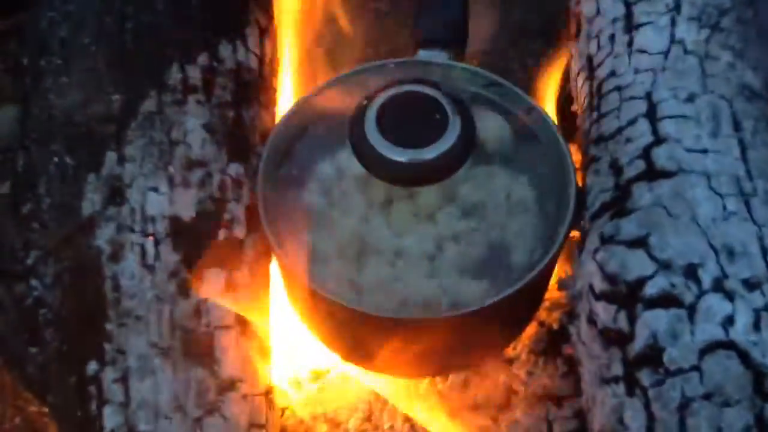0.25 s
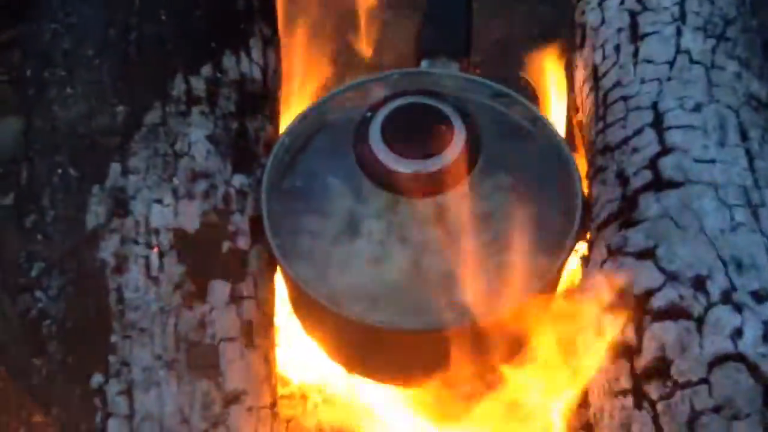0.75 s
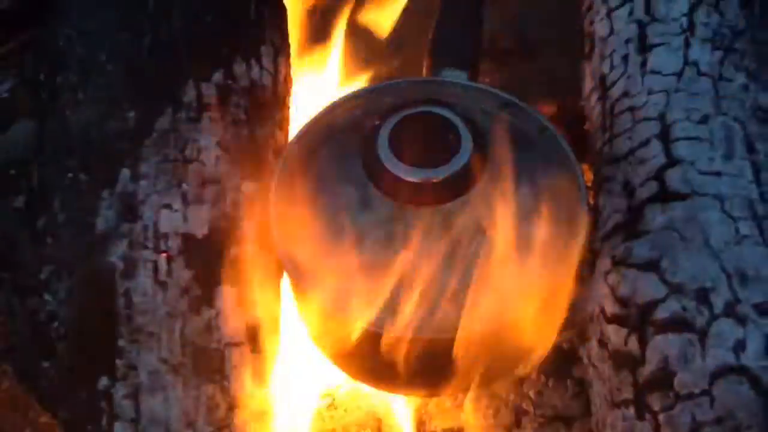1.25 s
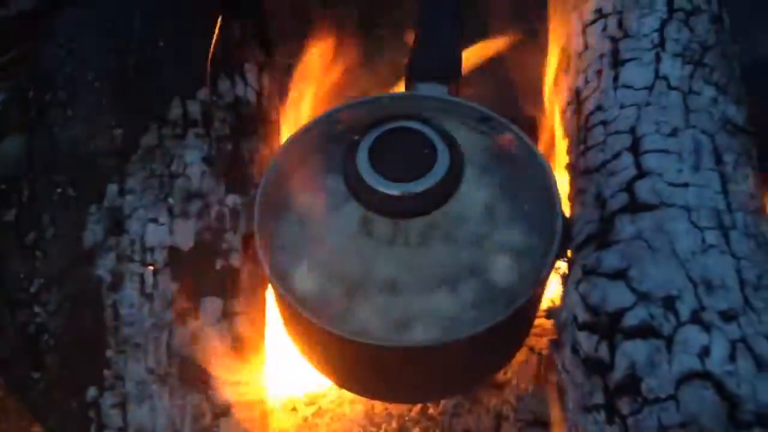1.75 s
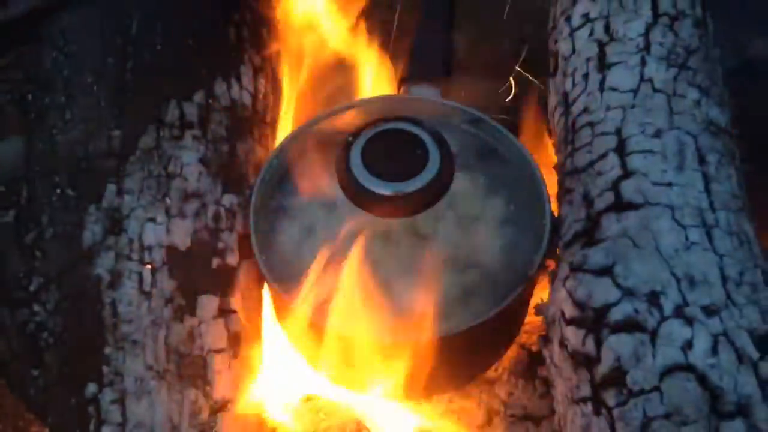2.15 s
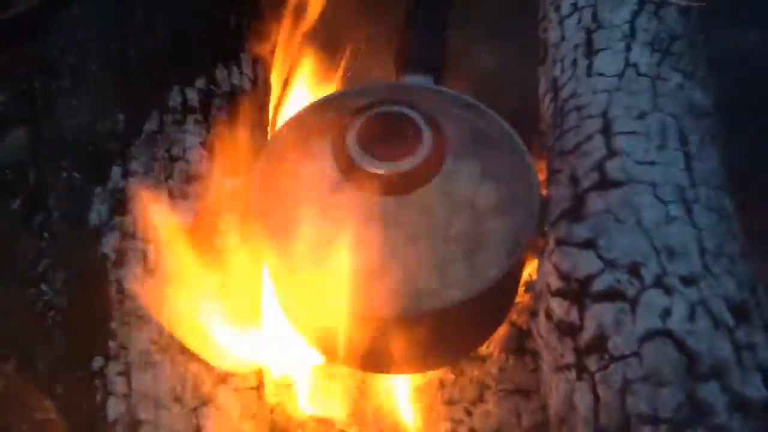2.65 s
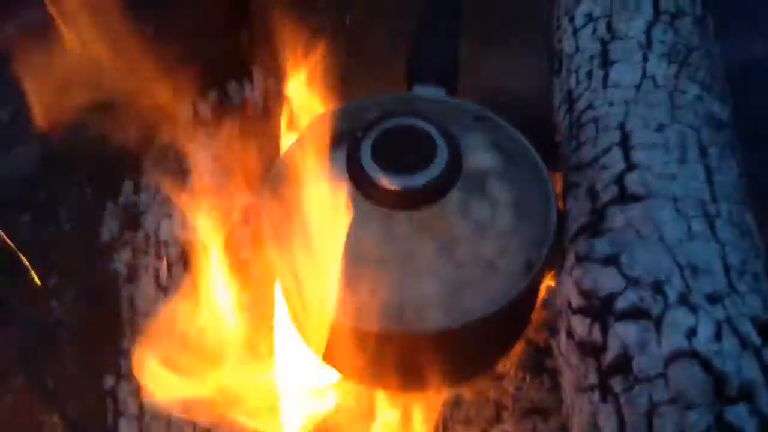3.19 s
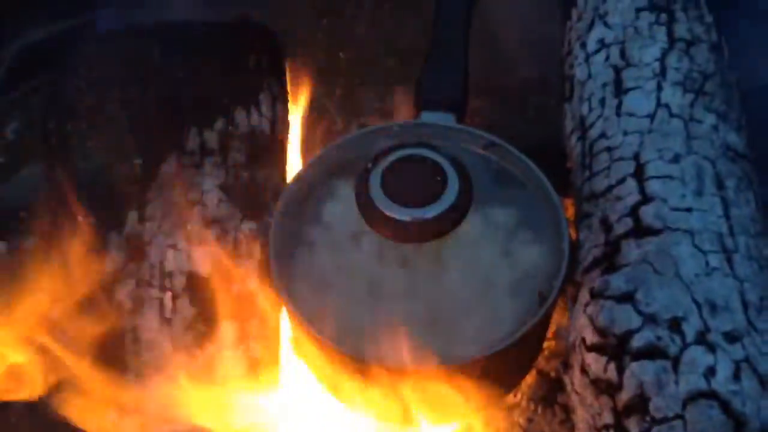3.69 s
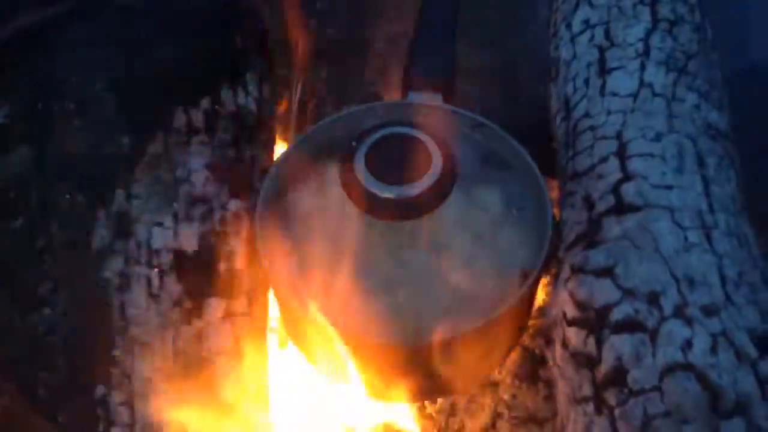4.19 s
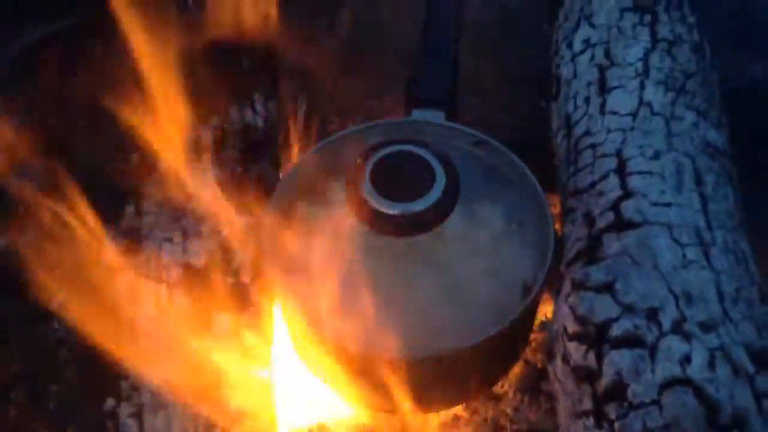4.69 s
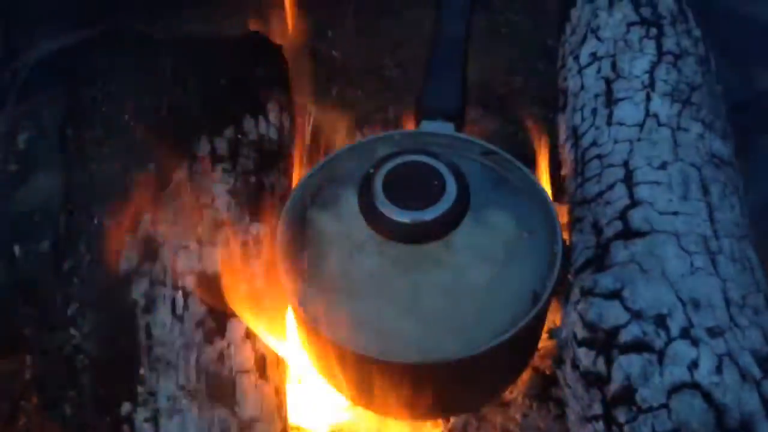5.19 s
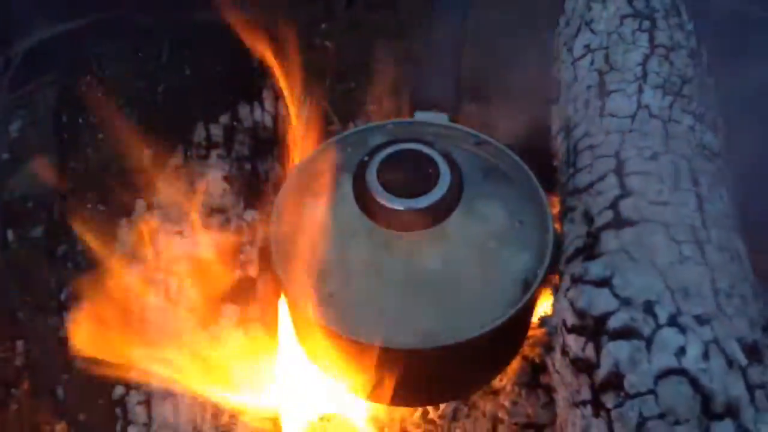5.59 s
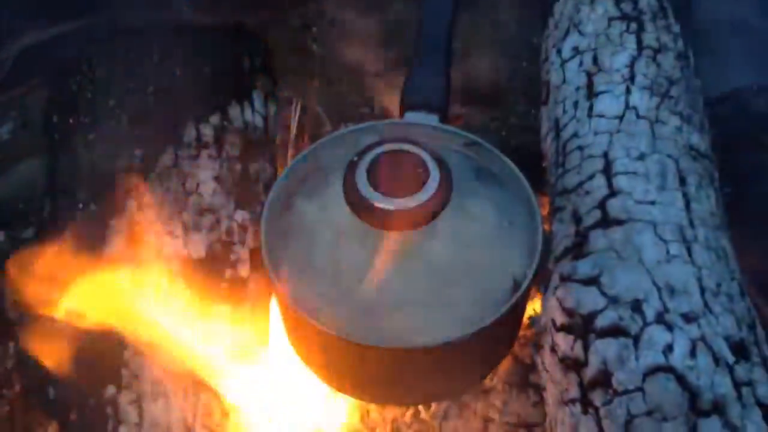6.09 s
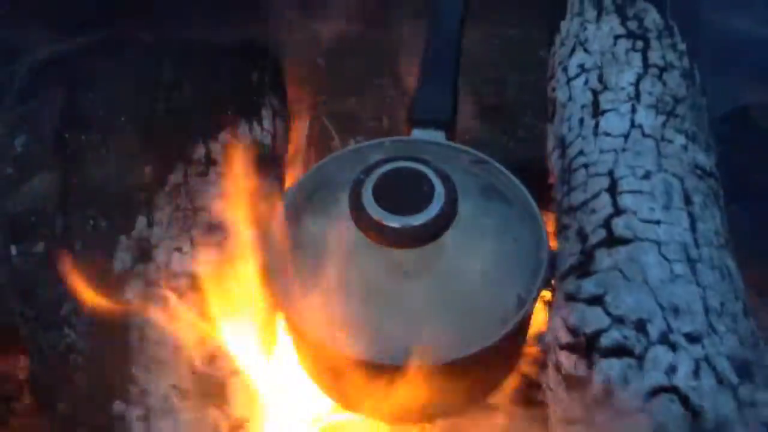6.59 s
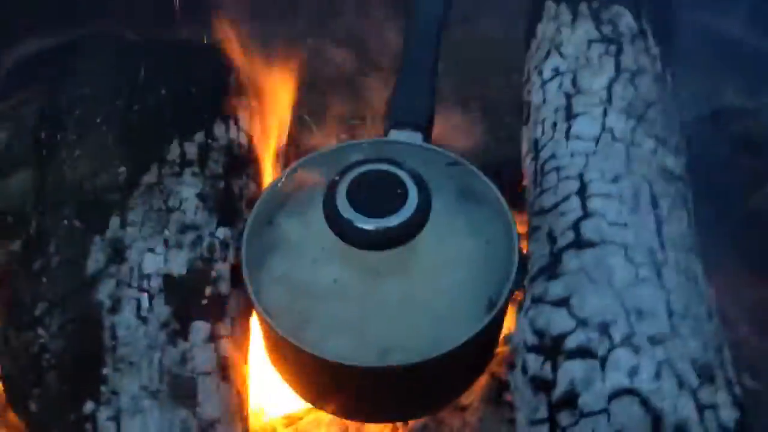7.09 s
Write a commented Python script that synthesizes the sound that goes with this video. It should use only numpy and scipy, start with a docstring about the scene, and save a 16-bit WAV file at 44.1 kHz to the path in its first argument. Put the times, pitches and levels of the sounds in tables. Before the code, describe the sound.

A close, dry microphone above a campfire pan picks up irregular popping throughout, densest around two seconds and again after five and a half. Bright cracks ring the metal briefly over steady frying hiss and skittering kernels. The hiss rises with short steam spurts in the middle. Fire rushes and flutters softly underneath, with bright crackling snaps and brief gusts, then eases near the end.

```python
"""Outdoors, close above an open wood fire with no echo, popcorn pops in a lidded pan.
Each hull cracks as shaped noise, spits steam, and rings pan, lid and the air inside as damped modes.
Dropping kernels tap the pan, and now and then something knocks. Random rains of tiny noise bursts
make the sizzling, frying and skittering. Wood and oil snap, and noise makes the fluttering flames."""
import sys
import numpy as np
from scipy import signal
from scipy.fft import rfft, irfft
from scipy.io import wavfile
from scipy.ndimage import uniform_filter1d

SR = 44100
rng = np.random.default_rng(int(sys.argv[2]) if len(sys.argv) > 2 else 0)


def wrap_up_sound(samples):
    """Save the sound to the file named by the first command line argument, as 16-bit audio."""
    columns = np.atleast_2d(samples).T
    # keep every value between -1 and 1, then stretch to whole-number steps
    tamed = np.clip(columns, -1, 1)
    steps = np.round(tamed * 32767).astype(np.int16)
    wavfile.write(sys.argv[1], SR, steps)


N = 323870
HIT_SIZE = 4096  # samples in one hit
AGE = np.arange(HIT_SIZE) / SR  # seconds since a hit began
TIME = np.arange(N) / SR  # seconds since the scene began
POP_S, SNAP_S = 0.008, 0.004  # seconds over which the level of a hit is counted
USUAL_BOIL_DB = -43  # the boil at which frying and skittering have their basic levels

# kernels bursting, and at 2.931 s a small knock; levels before each part's own offset:
# t/s, hull crack/dB, steam spit/dB, kick on lid and air/dB, note of the hull f/Hz
POPS = [(0.1516, -26, -27.5, -49, 5760), (0.1812, -26.5, -22.5, -45, 5700), (0.185, -31.5, -47, -50, 5600),
        (0.213, -33.5, -37, -50.5, 5700), (0.401, -31, -22.5, -48, 5430), (0.465, -41, -53, -52.5, 5700),
        (0.853, -35.5, -37, -44.5, 6400), (0.8736, -41.5, -33, -45.5, 8800),
        (1.0302, -32.5, -39, -36.5, 8700), (1.3545, -26.5, -25, -43, 3210), (1.384, -34, -30.5, -48, 8500),
        (1.409, -28.5, -29.5, -36, 2860), (1.532, -39, -43, -46, 4600), (1.7446, -28, -20.5, -41.5, 8600),
        (1.85, -37.5, -31.5, -47, 2780), (1.894, -33.5, -33.5, -44.5, 6670), (1.9036, -36, -51, -53, 6500),
        (2.081, -32.5, -32, -36.5, 7800), (2.0882, -28, -31, -57, 8700), (2.0943, -29, -26, -39, 4900),
        (2.0993, -26, -27, -41.5, 3670), (2.1758, -25.5, -23.5, -43.5, 7400),
        (2.402, -31, -34.5, -37.5, 2600), (2.4243, -35.5, -45, -37.5, 5600),
        (2.4319, -37.5, -41, -37, 2600), (2.5055, -33, -33, -39.5, 4740), (2.7466, -39, -40, -39.5, 2650),
        (2.7517, -33, -49, -38.5, 5300), (2.931, -35.5, -37, -42, 3320), (3.157, -38.5, -40, -54, 8700),
        (3.2141, -26, -33, -40.5, 4560), (3.235, -29.5, -22.5, -35.5, 4500), (3.2678, -32, -46, -37, 2880),
        (3.2794, -26.5, -27, -42.5, 3120), (3.389, -26, -21, -42, 3060), (3.398, -22.5, -27, -39, 3070),
        (3.608, -44, -51, -40, 9000), (3.7612, -25.5, -29, -34.5, 8000), (3.8631, -25, -27, -35, 3200),
        (4.0377, -30, -35, -32.5, 2600), (4.0445, -30.5, -39, -52, 3150), (4.465, -42.5, -37, -41, 3250),
        (4.75, -31.5, -24.5, -42, 7600), (4.933, -39.5, -53, -41.5, 3200), (4.9708, -38.5, -32, -47, 3050),
        (5.5162, -26.5, -29, -35.5, 4900), (5.574, -26.5, -24, -35, 4300), (5.6605, -24, -28, -36, 4560),
        (5.6811, -36, -26.5, -43, 8500), (5.8644, -29, -38, -48, 7800), (6.1154, -39, -28, -46.5, 6300),
        (6.139, -31, -32, -37.5, 4560), (6.171, -35.5, -44, -41, 7360), (6.406, -41, -45, -45.5, 4500),
        (6.4578, -23.5, -19.5, -40, 4700), (6.5065, -30, -23.5, -43, 6600), (6.538, -21, -19, -37.5, 4500),
        (6.6604, -25, -24.5, -41, 3160), (6.7194, -24, -21, -42.5, 7900), (6.7946, -33, -36, -44.5, 4100),
        (6.7982, -30, -31.5, -43, 3970), (7.2155, -31.5, -30.5, -53, 6350)]
# how hard the oil boils; drives sizzle, frying and skittering: t/s, boil level/dB
BOIL = [(0.0, -48.5), (0.59, -48), (1.16, -45.5), (1.47, -37.5), (1.61, -42.5), (1.8, -46), (2.9, -42),
        (3.09, -42), (3.25, -41), (3.66, -39), (4.15, -39), (5.52, -37), (6.11, -40), (6.27, -40.5),
        (6.46, -43.5), (6.73, -45.5), (6.91, -44.5), (7.34, -43.5)]
# ringing tones of the pan, before random detuning: f/Hz, width/Hz, level/dB
PAN_MODES = [(2980, 170, -4), (3240, 110, 1), (3710, 150, -5), (4520, 150, -2), (5530, 190, -4),
             (6020, 230, -8), (6580, 260, -6)]
# tone colour of a crack: f/Hz, level/dB
CRACK_COLOUR = [(40, -96), (200, -8), (600, -4), (1300, -12), (2300, 3.5), (3100, 10), (6500, 4),
                (9000, -8.5), (16000, -32)]


def undb(db):
    """Decibels to gain."""
    return 10 ** (np.asarray(db) / 20)


def curves(table):
    """Draw straight lines through each column of a table of (t/s, values), for every sample."""
    s, *columns = np.transpose(table)
    return [np.interp(TIME, s, column) for column in columns]


def unit(x):
    """Scale to an rms (average strength) of one."""
    return x / np.sqrt(np.mean(x ** 2))


def sized(x, db, seconds):
    """Give a hit the energy of a sound that holds db for so many seconds."""
    return x * undb(db) * np.sqrt(seconds * SR / np.sum(x ** 2))


def add(track, s, sound):
    """Mix a sound into the track at time s."""
    start = max(int(s * SR), 0)
    track[start:start + len(sound)] += sound[:max(N - start, 0)]


def response(colour):
    """Turn (f/Hz, level/dB) points into a short filter that starts at once (minimum phase)."""
    hz, db = np.transpose(colour)
    bins = np.maximum(np.fft.rfftfreq(HIT_SIZE, 1 / SR), 1)
    level_db = np.interp(np.log(bins), np.log(hz), db)
    cepstrum = irfft(np.log(undb(level_db)))
    # fold the second half onto the first, so that nothing sounds before the hit
    cepstrum[1:HIT_SIZE // 2] *= 2
    cepstrum[HIT_SIZE // 2 + 1:] = 0
    return irfft(np.exp(rfft(cepstrum)))


def through(x, body):
    """Pass a sound through an impulse response."""
    return signal.fftconvolve(x, body)[:len(x)]


def ring(modes, spread_db, detune):
    """Add up dying tones, wider ones dying faster; strength, pitch and sign vary with each blow."""
    hz, width, db = np.transpose(modes)[:, :, None]
    strength, pitch, side = rng.standard_normal((len(modes), 3)).T[:, :, None]
    gain = np.sign(side) * undb(db + spread_db * strength) * np.sqrt(width)
    fade = np.exp(-np.pi * width * AGE)
    tone = np.cos(2 * np.pi * hz * (1 + detune * pitch) * AGE)
    return np.sum(gain * fade * tone, axis=0)


def strike(modes, swell, decay, spread_db, detune):
    """Modes rung by a short push: they swell, lose their first strength quickly and then ring out."""
    shape = (1 - np.exp(-(AGE / swell) ** 2)) * (1 + np.exp(-AGE / decay))
    return shape * ring(modes, spread_db, detune)


def burst(swell, decay, tail_db=-60, tail_s=0.004):
    """A puff of noise that swells, dies fast and leaves a weak scattered tail."""
    fade = np.exp(-AGE / decay) + undb(tail_db) * np.exp(-AGE / tail_s)
    shape = (1 - np.exp(-(AGE / swell) ** 2)) * fade
    return shape * rng.standard_normal(HIT_SIZE)


def walk(rate, size=N):
    """A smooth random wander: levels held for 1 / rate seconds, smoothed twice, with spread near one."""
    hold = max(int(SR / rate), 2)
    steps = np.repeat(rng.standard_normal(size // hold + 2), hold)
    smooth = uniform_filter1d(uniform_filter1d(steps, hold), hold)
    return unit(smooth)[:size]


def grains(rate, spread_db, decay, limit_db):
    """A random rain of tiny noise bursts, about rate a second, mostly weak and a few strong."""
    chance, size, noise = rng.random(N), rng.exponential(size=N), rng.standard_normal(N)
    energy = (chance < rate / SR) * undb(np.minimum(spread_db * size, limit_db)) ** 2
    fading = signal.lfilter([1], [1, -np.exp(-1 / (decay * SR))], energy)
    return unit(noise * np.sqrt(fading))


def surges(table):
    """Power of short swells from rows of (t/s, half length/s, level/dB)."""
    return sum(undb(db) ** 2 * np.exp(-np.minimum(((TIME - s) / half) ** 2, 20))
               for s, half, db in table)


def lid_at(s):
    """Pitch of the lid and how freely it rings at time s."""
    # the lid's ring shifts in pitch and is muffled for a while: t/s, f/Hz, ring offset/dB
    lid_path = [(0, 1969, 5.5), (2.8, 1995, 5.5), (3.3, 1905, -4.5), (3.8, 2110, -3), (5.498, 2053, -7.5),
                (7.3, 2000, 2.5)]
    times, hz, ring_db = np.transpose(lid_path)
    return np.interp(s, times, hz), np.interp(s, times, ring_db)


def fire():
    """Noise in two colours, with wandering levels, makes rushing, fluttering flames; logs crackle."""
    # strength of the fire before the gains below: t/s, rush level/dB, flutter level/dB
    flame_levels = [(0.0, -65, -72), (0.78, -69, -75), (0.98, -62, -64), (1.49, -58.5, -63.5),
                    (1.96, -63, -68.5), (2.27, -56.5, -63.5), (2.7, -61.5, -65), (3.02, -56, -66),
                    (3.93, -52.5, -60.5), (4.37, -56, -62.5), (5.56, -56.5, -66), (5.72, -53, -61),
                    (5.93, -53.5, -65), (6.77, -63, -71), (7.34, -60.5, -70)]
    # colours of rush and flutter: f/Hz, level/dB
    rush_colour = [(150, -13.5), (450, -1), (800, -1.5), (1150, -5), (1550, -2.5), (2500, -2.5),
                   (5000, -24)]
    flutter_colour = [(20, -34), (50, -56), (80, -14), (105, 0), (180, 0.5), (300, -0.5), (450, -7.5),
                      (800, -28.5), (2000, -48)]
    rush_gain_db, flutter_gain_db = 10.5, 22.5
    rush_db, flutter_db = curves(flame_levels)
    crackle = grains(rate=70, spread_db=5, decay=0.0013, limit_db=12)
    rush = (rng.standard_normal(N) + undb(-3) * crackle) * undb(rush_db + 1.0 * walk(23))
    flutter = rng.standard_normal(N) * undb(flutter_db + 3.2 * walk(35))
    return (through(rush, response(rush_colour)) * undb(rush_gain_db)
            + through(flutter, response(flutter_colour)) * undb(flutter_gain_db))


def flares():
    """Flares whoosh in hollow, drifting resonances between the logs; a very short one is a hollow knock."""
    # whooshes of flame, and at 6.328 s a very short hollow knock; 1 dB below their final level:
    # t/s at the middle, half length/s, level/dB, favoured f/Hz
    gusts = [(1.505, 0.094, -53.5, 920), (2.315, 0.0046, -45, 700), (2.36, 0.016, -55, 786),
             (2.922, 0.017, -42.5, 1420), (3.018, 0.085, -49.5, 1320), (3.637, 0.047, -53, 1000),
             (3.944, 0.046, -51, 497), (4.011, 0.038, -45.5, 1450), (5.132, 0.094, -49, 2300),
             (5.689, 0.036, -46.5, 700), (5.743, 0.03, -44, 2560), (5.831, 0.034, -50, 2100),
             (6.328, 0.0032, -44, 1200)]
    # hollow resonances between the logs, before drift: f/Hz, width/Hz, level/dB
    hollow_modes = [(453, 130, -1), (670, 130, 0), (940, 170, -2), (1200, 220, -2.5), (1540, 190, -1),
                    (2010, 450, -2), (2520, 650, -1)]
    wander, rise, flicker_db = 0.04, 0.14, 2.5  # shares of the pitch; spread of each mode's level
    fall_db_per_octave = 4.5  # modes weaken away from the favoured pitch
    out = np.zeros(N)
    for s, half, db, centre_hz in gusts:
        edges = [int((s - 3.5 * half) * SR), int((s + 3.5 * half) * SR)]
        start, end = np.clip(edges, 0, N)
        size = end - start
        swell = np.exp(-((TIME[start:end] - s) / half) ** 2 / 2)
        sound = 0
        for hz, width, mode_db in hollow_modes:
            # the pitch rises and falls with the swell
            pitch = hz * (1 + wander * walk(22, size) + rise * (swell - 1) / 2)
            # random swirls widen each tone into a band of noise
            eddies = walk(2 * width, size) + 1j * walk(2 * width, size)
            distance = abs(np.log2(hz / centre_hz))
            gain_db = mode_db - fall_db_per_octave * distance + flicker_db * walk(43.7, size)
            tone = np.exp(2j * np.pi * np.cumsum(pitch) / SR)
            sound = sound + undb(gain_db) * np.real(eddies * tone)
        out[start:end] += unit(sound) * swell * undb(db + 1)
    return out


def snaps():
    """Little pockets of gas and oil burst with a bright tick, a weaker crack and a ring of the pan."""
    # small sharp snaps, before the offsets below: t/s, tick level/dB, body level/dB
    snap_hits = [(0.4942, -29.5, -54), (0.7446, -33, -64), (1.137, -31, -55), (1.2665, -23.5, -38),
                 (1.38, -14, -37), (1.6925, -24.5, -44), (1.7172, -27, -46), (2.78, -27, -42),
                 (2.8393, -41, -54), (2.9134, -15.5, -42), (2.999, -24.5, -51), (3.035, -24.5, -54),
                 (3.2263, -17, -48), (3.493, -24, -47), (3.7056, -23, -51), (3.7486, -23, -50),
                 (3.787, -19.5, -53), (3.927, -15.5, -40), (3.9717, -13, -37), (4.1747, -25, -37),
                 (4.1879, -20, -35), (4.2517, -18.5, -48), (4.5766, -25, -50), (4.6158, -17.5, -41),
                 (4.6485, -14.5, -54), (5.0336, -22, -41), (5.0535, -25, -41), (5.1862, -28, -47),
                 (5.2265, -24, -55), (5.2966, -12.5, -40), (5.3726, -22, -54), (5.4763, -19.5, -58),
                 (5.756, -12.5, -50), (6.0938, -18.5, -54), (6.104, -21, -49), (7.06, -35, -54)]
    # colour of the tick: f/Hz, level/dB
    tick_colour = [(500, -15), (4000, 2), (7500, 13), (11500, 17), (15500, 7.5)]
    out, tick_body, crack_body = np.zeros(N), response(tick_colour), response(CRACK_COLOUR)
    for s, tick_db, body_db in snap_hits:
        snap = burst(0.0003, 0.0005, tail_db=-16, tail_s=0.003)
        pan = strike(PAN_MODES[:3], 0.0015, 0.0012, spread_db=5, detune=0.02)
        body = unit(through(snap, crack_body)) + unit(pan)
        tick = sized(through(snap, tick_body), tick_db - 6.5, SNAP_S)
        add(out, s, tick + sized(body, body_db + 1.5, SNAP_S))
    return out


def sizzle():
    """Countless tiny bursts merge into a hiss that spurts; bubbles crackle in bands of their own."""
    # spurts of hissing steam, before the offset below: t/s at the middle, half length/s, level/dB
    spurts = [(1.11, 0.038, -40.5), (1.3, 0.027, -42), (1.54, 0.046, -36.5), (1.7, 0.04, -38.5),
              (3.02, 0.1, -40), (3.435, 0.03, -31), (3.458, 0.017, -29), (3.497, 0.0065, -29),
              (3.517, 0.011, -31.5), (3.765, 0.013, -29), (4.205, 0.036, -33), (4.41, 0.019, -36),
              (4.63, 0.024, -32), (4.88, 0.048, -38.5), (5.19, 0.033, -34.5), (5.535, 0.049, -30),
              (5.745, 0.025, -31.5), (6.105, 0.0085, -28.5), (6.41, 0.099, -39)]
    # colour of the sizzle: f/Hz, level/dB
    sizzle_colour = [(500, -25.5), (2500, -8), (5000, -6.5), (7500, -2), (11000, -1), (13500, -2),
                     (15500, -7)]
    hiss_db, spurt_db = -0.58, -2  # offsets to the boil and to the spurts
    boil_db, = curves(BOIL)
    hiss = grains(rate=5000, spread_db=2, decay=0.0004, limit_db=6)
    crackle = grains(rate=220, spread_db=6, decay=0.0006, limit_db=15)
    fizz = 0
    for band_hz in [(2500, 5500), (5500, 9000), (9000, 12500), (12500, 16000)]:
        bubbles = grains(rate=220, spread_db=5, decay=0.0007, limit_db=14)
        band = signal.butter(2, band_hz, "band", fs=SR, output="sos")
        fizz = fizz + signal.sosfilt(band, bubbles)
    # the powers of steady hiss and spurts add up
    flow = np.sqrt(undb(boil_db + hiss_db) ** 2 + undb(spurt_db) ** 2 * surges(spurts))
    bursts = 0.72 * hiss + 0.5 * crackle + 0.7 * fizz
    mix = bursts * flow * undb(1.2 * walk(110) + 0.75 * walk(35))
    return through(mix, response(sizzle_colour))


def frying():
    """Oil fries and spatters under the lid as dense and sparse noise bursts, growing with the boil."""
    # colour of the frying: f/Hz, level/dB
    fry_colour = [(400, -24), (1500, -20), (2000, -20), (2450, -12.5), (2900, 1), (3250, 2.5), (3600, -1.5),
                  (4500, -0.5), (6500, -10), (12000, -9)]
    usual_db, growth = -47.5, 1.23  # level at the usual boil; dB gained for each dB more
    boil_db, = curves(BOIL)
    spatter = grains(rate=110, spread_db=5, decay=0.001, limit_db=12)
    fry = grains(rate=3000, spread_db=2, decay=0.001, limit_db=6) + undb(-5) * spatter
    fry_db = usual_db + growth * (boil_db - USUAL_BOIL_DB)
    return through(fry * undb(fry_db), response(fry_colour))


def skittering():
    """Unpopped kernels dance in the oil and tick at the lid's pitch, harder as it boils harder."""
    boil_db, = curves(BOIL)
    lid_hz, ring_db = lid_at(TIME)
    ticks = grains(rate=160, spread_db=2, decay=0.0005, limit_db=6)
    lid_tone = np.sin(2 * np.pi * np.cumsum(lid_hz) / SR)
    ringing = through(ticks, np.exp(-AGE / 0.005)) * lid_tone
    return unit(ringing) * undb(-66.5 + ring_db + boil_db - USUAL_BOIL_DB)


def tumbling():
    """After each row of the pops, four kernels patter down and faintly ring the lid and pan."""
    fall_s, fall_spread_s = 0.013, 0.1  # shortest fall, and the most that chance adds
    out = np.zeros(N)
    for s, crack_db, _, kick_db, _ in POPS:
        lid_hz, ring_db = lid_at(s)
        for wait in rng.random(size=4):
            lid = strike([(lid_hz, 50, 0)], 0.0021, 0.0046, spread_db=0, detune=0.01)
            pan = strike(PAN_MODES, 0.0004, 0.002, spread_db=4, detune=0.015)
            lid_db = 0.72 * (kick_db + ring_db) - 36
            pan_db = 0.58 * crack_db - 48
            tap = sized(lid, lid_db, POP_S) + sized(pan, pan_db, POP_S)
            # later landings are weaker
            add(out, s + fall_s + fall_spread_s * wait, tap * undb(-6 * wait))
    return out


def taps():
    """A dropping kernel ticks against the pan, rings its lowest modes and stirs the lid."""
    # kernels dropping, before the offset of each part: t/s, level/dB
    drops = [(0.0557, -43.5), (0.277, -43.5), (0.4525, -51), (0.661, -63), (1.919, -47), (2.204, -43),
             (2.225, -42), (2.2358, -44), (2.643, -46), (2.683, -48), (3.463, -36), (4.452, -47),
             (5.11, -37.5), (5.165, -34), (5.308, -42), (5.345, -41), (6.081, -42), (6.146, -27.5),
             (7.04, -50), (7.3337, -41.5)]
    out, crack_body = np.zeros(N), response(CRACK_COLOUR)
    for s, db in drops:
        lid_hz, ring_db = lid_at(s)
        tick = through(burst(0.00024, 0.00017), crack_body)
        pan = strike(PAN_MODES[:3], 0.0006, 0.002, spread_db=2.5, detune=0.01)
        lid = strike([(lid_hz, 66, 0)], 0.0005, 0.004, spread_db=0, detune=0.014)
        tap = sized(tick, db - 2, POP_S) + sized(pan, db - 3.5, POP_S)
        add(out, s, tap + sized(lid, db - 8 + ring_db, POP_S))
    return out


def knocks():
    """Softer, longer pushes bring out low modes; a faint rattle and a small rebound follow."""
    # dull knocks: t/s, level/dB, brightness f/Hz, swell/s, decay/s
    knock_hits = [(5.557, -18, 1780, 0.0038, 0.0019), (5.882, -18, 2200, 0.0029, 0.0022)]
    # ringing tones of a knock: f/Hz, width/Hz, level/dB
    knock_modes = [(186, 170, -20), (252, 75, 4), (461, 84, 0), (760, 150, 4), (1320, 140, 1),
                   (1547, 130, 5.5), (2070, 210, -23), (2506, 170, 7.5)]
    out = np.zeros(N)
    for s, db, bright_hz, swell, decay in knock_hits:
        push = burst(swell, decay, tail_db=-23, tail_s=0.016)  # the tail is the rattle
        colour = [(30, -46), (90, -22), (220, 2), (700, -7), (bright_hz, -2),
                  (1.6 * bright_hz, -12), (15000, -16)]
        clap = sized(through(push, response(colour)), db + 0.5, POP_S)
        body = strike(knock_modes, swell, 0.007, spread_db=0, detune=0)
        rebound = strike(knock_modes[:3], 0.004, 0.007, spread_db=0, detune=0.03)
        add(out, s, clap + sized(body, db, POP_S))
        add(out, s + 0.033, sized(rebound, db - 22.0, POP_S))
    return out


def popcorn():
    """A hull splits with its own note and steam spits out; pan, lid and the air between them ring."""
    # ringing of the air and kernels under the lid, before detuning: f/Hz, width/Hz, level/dB
    cavity_modes = [(162, 30, -13), (292, 38, -1.5), (342, 58, 3), (467, 120, -7), (587, 140, -6),
                    (876, 530, 1), (1360, 90, -7)]
    # colour of the steam: f/Hz, level/dB
    spit_colour = [(1000, -16), (5000, 3.5), (7600, 11.5), (11500, 11), (15500, 3.5)]
    lid_from_crack = 0.23  # share of the lid's level that follows the crack instead of the kick
    out, crack_body, spit_body = np.zeros(N), response(CRACK_COLOUR), response(spit_colour)
    for s, crack_db, spit_db, kick_db, hull_hz in POPS:
        # every pop gets the same weak scattered tail after its crack
        split = burst(0.00031, 0.00032, tail_db=-13, tail_s=0.0047)
        crack = sized(through(split, crack_body), -5, POP_S)
        hull_ring = ring([(hull_hz, 420, 0)], spread_db=0, detune=0)
        hull = sized(through(split, hull_ring), -3, POP_S)
        pan_ring = strike(PAN_MODES, 0.0012, 0.00041, spread_db=4.0, detune=0.0046)
        pan = sized(pan_ring, -1.84, POP_S)
        add(out, s, (crack + hull + pan) * undb(crack_db))

        steam = burst(0.0004, 0.0003, tail_db=-16, tail_s=0.0035)
        add(out, s, sized(through(steam, spit_body), spit_db, POP_S))

        lid_hz, ring_db = lid_at(s)
        lid = strike([(lid_hz, 58, 0)], 0.0009, 0.03, spread_db=0, detune=0.008)
        lid_db = kick_db + lid_from_crack * (crack_db - kick_db) + ring_db - 0.5
        thump = strike(cavity_modes, 0.0007, 0.0009, spread_db=5, detune=0.07)
        add(out, s, sized(lid, lid_db, POP_S) + sized(thump, kick_db, POP_S))
    return out


def scene():
    """All sources at one microphone."""
    kernels = popcorn() + taps() + tumbling() + skittering()
    pan = kernels + knocks() + undb(4) * sizzle() + frying()
    return (pan + snaps() + fire() + flares())[None]


def record(dry):
    """The microphone sheds deep bass; then the highest peaks are rounded and the top is cut steeply."""
    mic_low_hz, top_hz, ceiling = 116, 15350, 0.76
    low_cut = signal.butter(2, mic_low_hz, "high", fs=SR, output="sos")
    thin = signal.sosfilt(low_cut, dry)
    rounded = thin / (1 + (thin / ceiling) ** 6) ** (1 / 6)
    top_cut = signal.ellip(10, 0.2, 70, top_hz, fs=SR, output="sos")
    return signal.sosfilt(top_cut, rounded)


dry = scene()
out = record(dry)
wrap_up_sound(out)
```